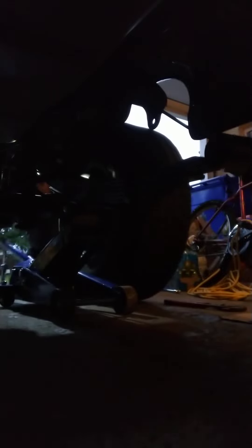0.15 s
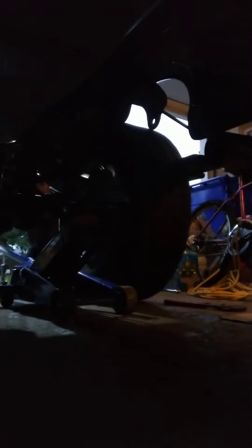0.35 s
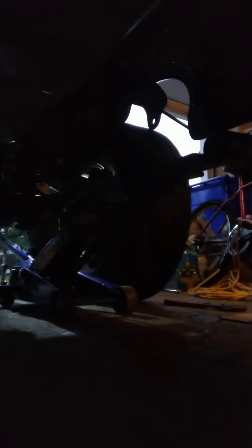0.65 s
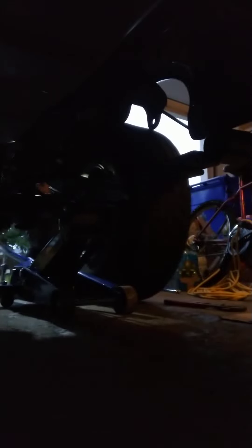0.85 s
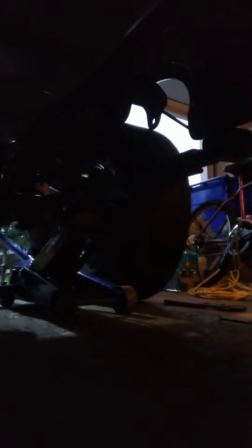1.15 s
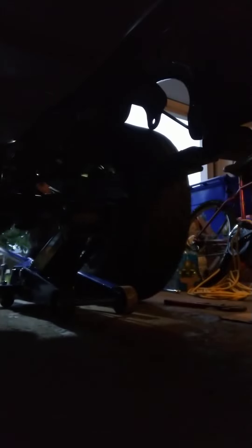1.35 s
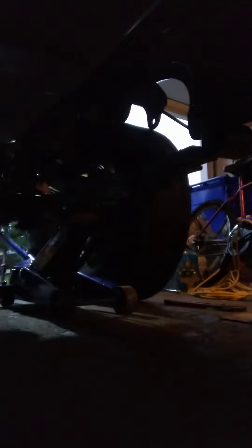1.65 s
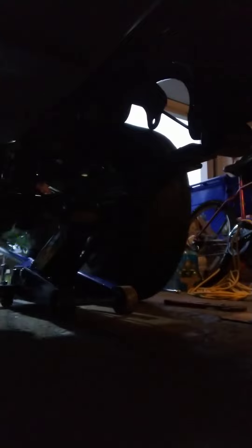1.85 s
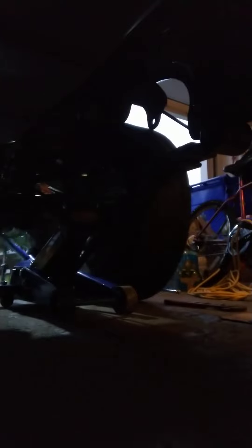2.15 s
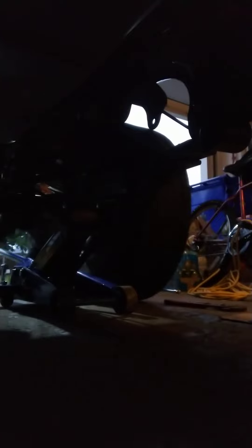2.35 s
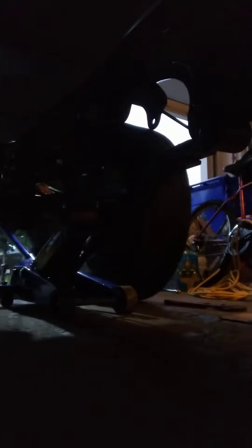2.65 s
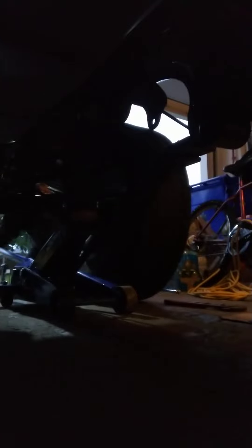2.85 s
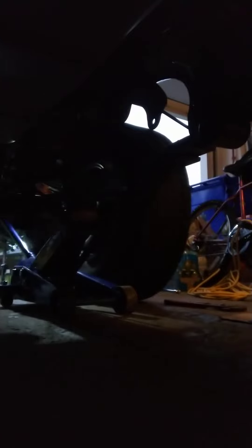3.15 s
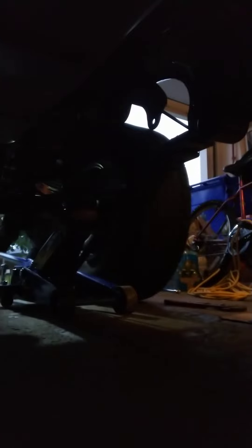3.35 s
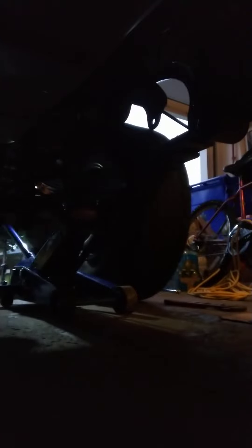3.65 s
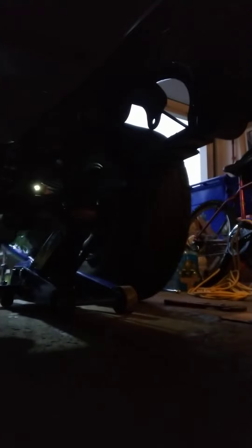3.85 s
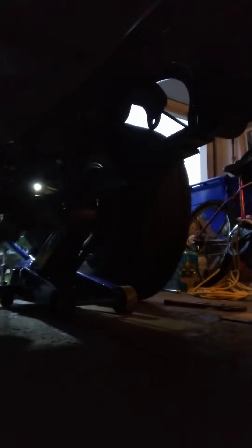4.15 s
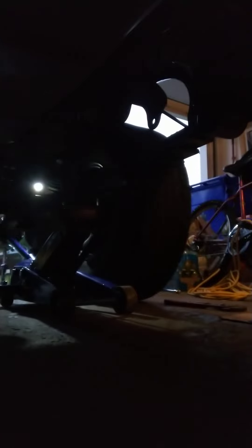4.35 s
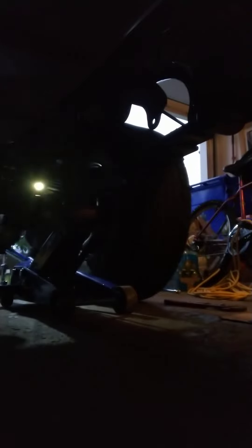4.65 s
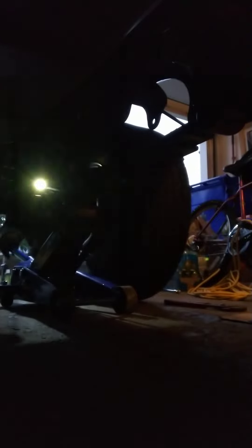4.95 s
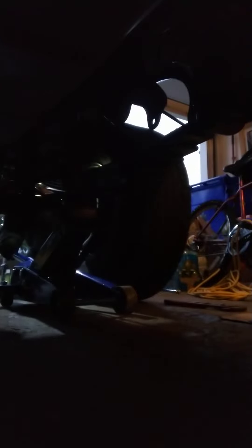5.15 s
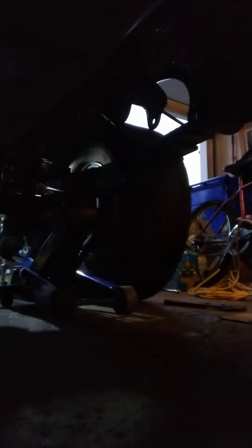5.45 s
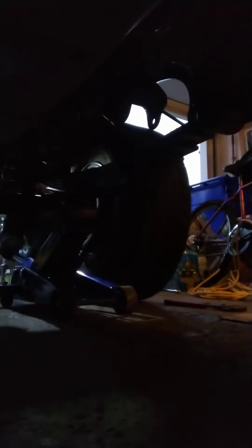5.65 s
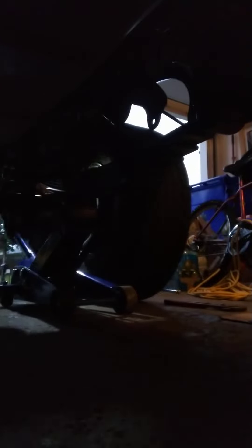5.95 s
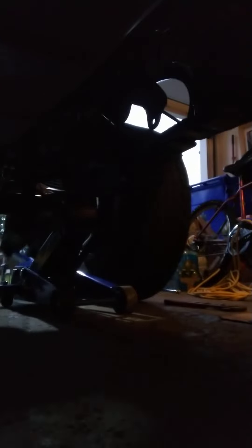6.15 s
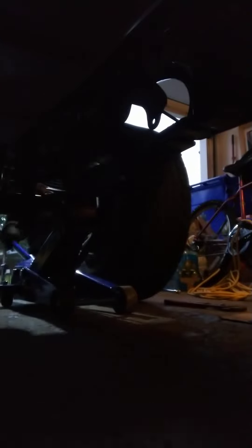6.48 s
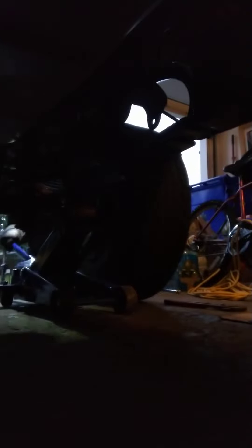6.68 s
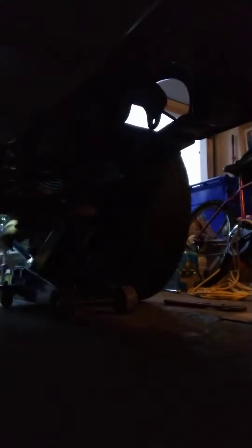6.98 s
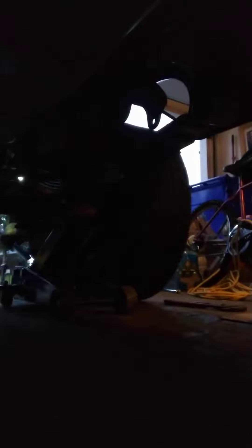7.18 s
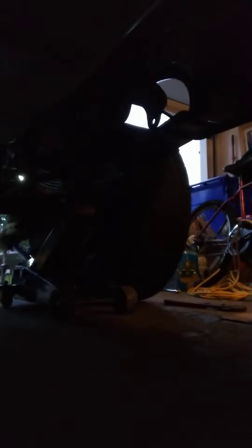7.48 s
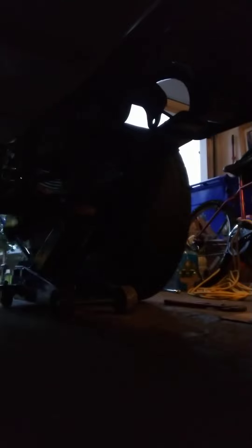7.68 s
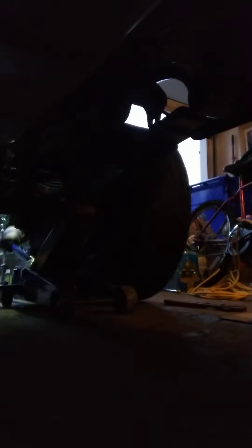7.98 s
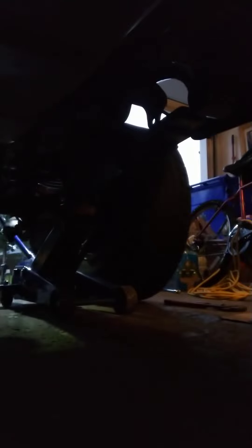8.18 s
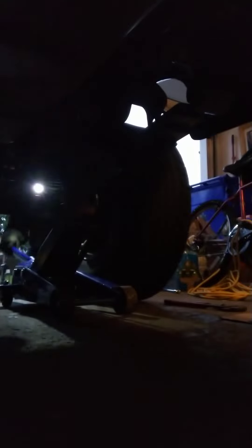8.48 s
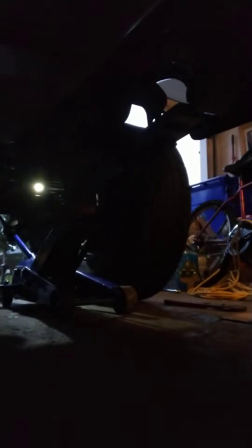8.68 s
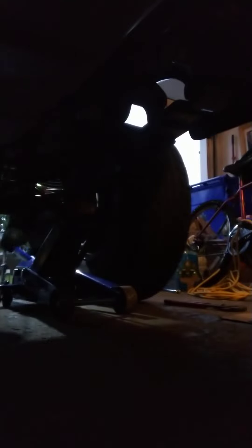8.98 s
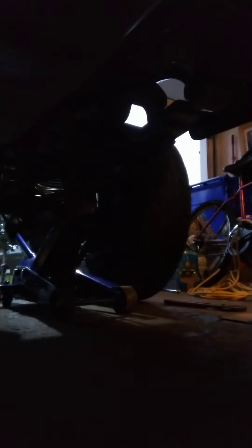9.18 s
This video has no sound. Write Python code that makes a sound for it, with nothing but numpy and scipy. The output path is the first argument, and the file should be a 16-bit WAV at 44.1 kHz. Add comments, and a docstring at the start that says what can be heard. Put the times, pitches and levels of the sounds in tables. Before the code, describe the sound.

Close to the floor of a garage, a jack handle knocks and its linkage clicks in an even rhythm while the truck above softly booms and rattles. A soft hiss ebbs away. About halfway the strokes stop for a brief scuff and one heavy, ringing clank of steel shifting under load. The pumping then carries on, knocking harder, each hit with a short room tail.

```python
"""A hydraulic floor jack, pumped about twice a second, lifts a truck in a garage.
Each stroke opens with a ringing knock of the handle and heaves the truck, which booms softly and
rattles; the linkage clicks as the handle turns back. Once, the steel slips under the load with a loud
clank. Every hit is a burst of crowded steel resonances plus a few clear tones and a short room tail.
Behind it, a soft hiss ebbs as the truck rises, dry pivots squeak and something scuffs the floor."""
import sys
import numpy as np
from scipy import signal
from scipy.fft import rfft, irfft, next_fast_len
from scipy.io import wavfile
from scipy.ndimage import uniform_filter1d

SR = 44100
rng = np.random.default_rng(int(sys.argv[2]) if len(sys.argv) > 2 else 0)


def materialize(psi):
    """Save the field psi as 16-bit PCM at rate SR to the path in sys.argv[1].

    A 1-D psi becomes a single channel; in a 2-D psi each row is a channel.
    """
    bounded = np.clip(np.atleast_2d(psi).T, -1, 1)
    quanta = np.round(bounded * 32767).astype(np.int16)
    wavfile.write(sys.argv[1], SR, quanta)


N = 411012
TIME = np.arange(N) / SR
HIT_TIME = TIME[:SR]  # seconds since a hit
TOP_HZ = 15300

# Fader rides for the hiss, the rumble between strokes and the low rush: time_s, level_db
HISS_RIDE = [(0.0, -46), (0.21, -46.5), (0.57, -55), (1.66, -54), (3.03, -63.5), (4.28, -65), (4.51, -64.5),
             (5.48, -68.5), (5.63, -92), (5.92, -69.5), (6.02, -62), (6.26, -64.5), (6.46, -84),
             (6.83, -72), (7.97, -72.5), (8.67, -79), (9.03, -70.5), (9.32, -72.5)]
RUMBLE_RIDE = [(0, -64.5), (1.1, -68), (2.1, -73), (3.7, -72.5), (4.4, -72), (4.85, -63.5), (5.2, -99),
               (5.7, -78.5), (6.85, -68), (7.18, -93), (7.8, -69.5), (8.35, -71.5), (8.7, -74.5),
               (9.32, -77)]
RUSH_RIDE = [(0, -54), (.35, -57), (.65, -65), (1.9, -67), (2.7, -81.5), (3.9, -100), (9.32, -110)]
# Tone of each noise layer: frequency_hz, gain_db
HISS_EQ = [(700, -24), (1100, -9.5), (2100, -11), (3500, -7), (5400, -4), (6600, 3.5), (8000, -8.5),
           (11000, -14.5), (12500, -27), (15000, -39)]
RUMBLE_EQ = [(20, -44), (38, -21), (52, -7.5), (66, -8), (85, 4), (108, -3), (128, -5), (170, -20.5),
             (300, -30.5), (700, -48.5)]
RUSH_EQ = [(120, -11), (230, 0), (380, -10), (550, -5), (780, -1), (1300, -5), (2200, -11.5), (5000, -28.5)]
SCUFF_EQ = [(800, -25.5), (2100, -10), (4000, -6.5), (6400, 2.5), (8000, -6), (11000, -14.5),
            (15000, -33.5)]
# Dry pivots: start_s, length_s, from_hz, to_hz, level_db
SQUEAKS = [(0.005, 0.055, 735, 790, -49), (0.199, 0.042, 940, 900, -47), (0.791, 0.093, 781, 653, -60),
           (0.82, 0.038, 2260, 1930, -54)]

# Hit cues, levelled before each part's trim. Body lifts the mids, edge the top, ring the clear tones.
# Handle against its stop: start_s, level_db, body_db, edge_db, ring_db, truck_heave_db
KNOCKS = [(0.248,-45.5,2,-7.5,-13,-59), (0.747,-47.5,6,-5,-20,-61), (1.227,-48,4,-6,-20,-61.5),
          (1.75,-47,6,-6,-12,-76), (2.246,-47,5.5,-8,-22,-64.5), (2.783,-47.5,7.5,-7.5,-9,-59.5),
          (3.305,-49,12,-4.5,-21,-64), (3.87,-51.5,9,-9,-12,-71), (4.488,-39.5,1.5,-9.5,-2.5,-62),
          (6.793,-38.5,-0.5,-11,-5.5,-86), (7.279,-37,3.5,-7.5,-1,-68.5), (7.821,-37,1,-11.5,3,-65),
          (8.338,-37.5,1.5,-8.5,-1.5,-71.5), (8.848,-37.5,2.5,-6.5,-6,-63)]
# Pump linkage: start_s, level_db, body_db, edge_db
CLICKS = [(0.382,-30,-9,-7), (0.894,-30.5,-6,-7), (0.967,-48,5.5,-9), (1.481,-48,5.5,-6),
          (1.869,-38.8,-6,-35), (1.983,-47.5,7,-2), (2.498,-50,9.5,-12), (2.865,-50,3,-37),
          (2.993,-48,7.5,-2), (3.536,-49,7,-3), (4.172,-51.5,7,-29), (4.563,-47.5,6,0),
          (4.621,-37.5,3.5,-23), (5.298,-55.5,-16,9), (5.867,-48.5,5.5,-6.5), (6.339,-33,4,0.5),
          (6.438,-48.5,4,5.7), (7.032,-45.5,2.5,-1), (7.5,-51.5,8.5,-7), (8.048,-47,5,-0.5),
          (8.58,-48,-1,0), (9.046,-45,0,1)]
# Joints of the lifting arm: start_s, level_db, body_db
TAPS = [(0.855,-56,1), (1.703,-59.5,10), (2.447,-59,3), (2.91,-56.5,3), (3.503,-52.5,-1), (3.836,-60,3),
        (4.589,-52,9), (4.728,-56.5,9), (5.158,-67.5,27), (6.145,-49,1), (6.309,-47,2), (7.417,-61,6),
        (7.451,-60,9), (8.007,-59,5.5), (8.974,-53.5,9), (9.008,-55.5,-1)]
# Handle socket, saddle and slipping steel: start_s, level_db
CLINKS = [(6.733, -72), (7.731, -49), (8.753, -68.5), (9.267, -53), (9.281, -53.5)]
CLUNKS = [(4.578, -55), (4.609, -51.5), (4.622, -39.5), (6.339, -39.5)]
CLANKS = [(6.0241, -14.5)]

# Tone of each part's crowded, short-lived resonances: frequency_hz, gain_db
HANDLE_EQ = [(120, -31), (250, -8), (450, -1.5), (800, -4), (1400, -0.5), (2200, -10.5), (2800, -2.5),
             (3900, -7.5), (4800, -3.5), (6700, 1), (8300, 0), (11000, -2.5), (15000, -15)]
LINK_EQ = [(120, -38), (400, -2), (900, -6.5), (1500, -7), (2200, -12), (3000, -4.5), (4500, -5),
           (5500, -2), (6500, 4.5), (7300, 2), (8200, -15.5), (11000, -17.5), (15000, -53)]
ARM_EQ = [(120, -9.5), (400, 7), (900, -8), (1450, -3), (2200, -9), (2900, -6), (3600, -9.5), (5000, -12),
          (6800, -3.5), (8000, -16), (11000, -23), (15000, -66)]
SOCKET_EQ = [(120, -1), (600, -2.5), (1450, -4), (2200, -13), (2900, 3.5), (3600, -13.5), (5000, -11),
             (6100, -2.5), (8000, -8.5), (11000, -16.5), (15000, -51)]
SADDLE_EQ = [(120, -8.5), (260, -17), (380, 4.5), (520, -10.5), (900, -15), (1550, -10), (2000, -22),
             (2450, -1.5), (3500, -12), (4400, -7), (8000, -32), (15000, -24)]
FRAME_EQ = [(40,-58), (100,-41), (170,-27), (215,-10), (290,-8.5), (390,-11), (560,-4.5), (833,-3.5),
            (1100,-13), (1500,-9.5), (2100,-16), (2850,-4), (4400,-12), (4950,-1.5), (7000,-1),
            (8800,-10.5), (10500,-11), (14500,-22)]
# Clear tones of each part: pitch_hz, gain_db, t60_s
HANDLE_TONES = [(1140, -25.5, 0.62), (1131, -8.5, 0.22), (1460, -8.5, 0.26), (1590, -10, 0.18),
                (1750, -5.5, 0.2), (2606, -5.5, 0.18), (3270, 0, 0.2), (3300, 0, 0.19), (3330, -4.5, 0.2),
                (4450, -11, 0.27), (4570, -5, 0.082), (4930, 0.5, 0.11), (5760, -2.5, 0.16),
                (6100, -4, 0.079), (6444, -22, .22), (7370, -16, 0.35)]
LINK_TONES = [(1164, -18, 0.43), (2730, -22, .12), (4120, -3.5, 0.091), (6050, 4, 0.068), (6840, 3, 0.075),
              (7360, -5, .14)]
ARM_TONES = [(1116, -12, 0.3), (1514, 1, 0.09), (2690, -22, 0.13)]
SOCKET_TONES = [(1532, -3, 0.27), (2710, -10, 0.12), (2854, 16.5, 0.033), (5739, 2, 0.081),
                (6240, 10, 0.076), (7290, -9, .15)]
SADDLE_TONES = [(358.5, -8, 0.13), (426, -1, 0.11), (1540, -9, 0.17), (2280, -7.5, 0.13),
                (4430, -13, 0.055)]
FRAME_TONES = [(192.7, -1.5, 0.4), (203, -5.5, 0.63), (228.6, -5, 0.5), (259, -4.5, 0.23), (303, -5, 0.26),
               (529, -7, 0.2), (818, -3, 0.18), (1150, -22, 0.79), (2630, -3, .14), (2950, -2, 0.13),
               (5062, -0.5, .15), (5520, -6, 0.37), (5600, -2, .17), (6100, -3, .18), (5900, -5.5, .17),
               (6750, 4, 0.2), (7100, 6.5, 0.16), (7592, 3.5, 0.24), (8400, -10.5, 0.17), (9900, -1, .14),
               (12100, -13.5, 0.1)]

# Stereo lean across the spectrum: frequency_hz, left_minus_right_db
STEREO_LEAN = [(60, 4.5), (110, 7.5), (200, 5.5), (380, 0.5), (700, -4.5), (1300, -7), (2400, -3.5),
               (4400, -8), (6200, -7.5), (7000, 2), (8500, -10.5), (15000, -6)]


def undb(db):
    """Decibels to gain."""
    return 10 ** (np.asarray(db) / 20)


def unit(x, span=slice(None)):
    """Scale to rms 1 within a span of samples."""
    return x / np.sqrt(np.mean(x[..., span] ** 2))


def add(out, sound, start_s):
    """Mix a sound in at its cue."""
    i = max(int(start_s * SR), 0)
    out[:, i:i + sound.shape[1]] += sound[:, :N - i]


def ride(points):
    """Gain over time along a fader ride."""
    time_s, level_db = np.transpose(points)
    return undb(np.interp(TIME, time_s, level_db))


def eq_gain(eq, hz):
    """Gain of an EQ curve at the given frequencies."""
    points_hz, gain_db = np.transpose(eq)
    return undb(np.interp(np.log(hz + 1), np.log(points_hz), gain_db))


def noise(eq, size=N, body_db=0, edge_db=0, body_hz=1050, body_octaves=0.68):
    """Coloured stereo noise with centred bass and wide treble."""
    n = next_fast_len(size)
    hz = np.arange(n // 2 + 1) * SR / n
    mid, side = rfft(rng.standard_normal((2, n)))
    width = hz ** 2 / (hz ** 2 + 550 ** 2)
    body = 1 / (1 + (np.log2((hz + 1) / body_hz) / body_octaves) ** 4)  # midrange hump
    edge = 1 - 1 / (1 + (hz / 7900) ** 24)  # top shelf
    stereo = mid + np.outer([1, -1], width * side)
    spectrum = stereo * eq_gain(eq, hz) * undb(body_db * body + edge_db * edge)
    return unit(irfft(spectrum, n)[:, :size])


def flutter(rate_hz, depth_db):
    """A quick random flutter of level."""
    size = int(SR / rate_hz)
    steps = np.repeat(rng.standard_normal(N // size + 1), size)[:N]
    return undb(depth_db * uniform_filter1d(steps, size))


def swells(cues, attack_s, hold_s, release_db_per_s):
    """An envelope that rises, holds and dies away at each cue; overlaps add in power."""
    power = np.zeros(N)
    for start_s, level_db in cues:
        age = TIME - start_s
        rise = np.clip(age / attack_s, 0, 1)
        fall_db = release_db_per_s * np.maximum(age - attack_s - hold_s, 0)
        power += (rise * undb(level_db - fall_db)) ** 2
    return np.sqrt(power)


def hiss():
    """A bright hiss ebbs as the truck rises; a thinner one follows each click of the linkage."""
    bed = undb(1.4) * ride(HISS_RIDE) * noise(HISS_EQ, body_db=-2)
    cues = [(click[0], -69) for click in CLICKS]
    returns = swells(cues, attack_s=.04, hold_s=.073, release_db_per_s=38)
    thin = returns * noise(HISS_EQ, body_db=-11.5, body_hz=1900, body_octaves=.97)
    return (bed + thin) * flutter(rate_hz=130, depth_db=1.5)


def scuff(start_s=5.36):
    """Something slides briefly over the floor with a soft thud."""
    slide = undb(-50.5) * noise(SCUFF_EQ) * flutter(rate_hz=380, depth_db=2)
    thud = undb(-69) * noise(RUMBLE_EQ)
    return swells([(start_s, 0)], attack_s=.066, hold_s=.025, release_db_per_s=110) * (slide + thud)


def squeaks(waver=.064, waver_s=.0014):
    """Dry pivots stick and slip for a moment at a gliding, unsteady pitch."""
    out = np.zeros((2, N))
    for start_s, length_s, from_hz, to_hz, level_db in SQUEAKS:
        size = int(length_s * SR)
        wobble = unit(uniform_filter1d(rng.standard_normal((2, size)), int(waver_s * SR)))
        pitch_hz = np.linspace(from_hz, to_hz, size) * (1 + waver * wobble)
        tone = np.sin(2 * np.pi * np.cumsum(pitch_hz, axis=1) / SR)
        add(out, undb(level_db) * np.hanning(size) * tone, start_s)
    return out


def truck(heave_lag_s=.041):
    """Strokes heave the truck and heavy hits jolt it: a soft boom under a fluttering low rush."""
    lifts = [(knock[0] + heave_lag_s, knock[-1]) for knock in KNOCKS]
    heave = swells(lifts, attack_s=.1, hold_s=.07, release_db_per_s=123)
    blows = [(s, db - 18) for s, db in CLUNKS] + [(s, db - 41) for s, db in CLANKS]
    jolt = swells(blows, attack_s=.026, hold_s=.11, release_db_per_s=150)
    motion = np.hypot(heave, jolt)
    boom = np.hypot(motion, ride(RUMBLE_RIDE)) * noise(RUMBLE_EQ)
    rush = ride(RUSH_RIDE) * noise(RUSH_EQ)
    rush += undb(-10) * motion * noise(RUSH_EQ, body_db=-9, body_octaves=2.1)
    return boom + rush * flutter(rate_hz=25, depth_db=4)


def shudder():
    """Loose metal shivers on for a moment after the clank: one swell of bright and low noise."""
    shiver = undb(-34) * noise(HISS_EQ) + undb(-39) * noise(RUSH_EQ)
    return swells(CLANKS, attack_s=.07, hold_s=.04, release_db_per_s=126) * shiver


def fade(t60_s):
    """Exponential decay after a hit."""
    return np.exp(-np.log(1000) * HIT_TIME / t60_s)


def crowded(eq, count=260):
    """Break a smooth EQ into the many uneven resonances of one steel part."""
    hz = np.linspace(np.sqrt(100), np.sqrt(TOP_HZ), count) ** 2
    peaks_db = rng.uniform(-9, 5, count)
    return np.column_stack([hz, 20 * np.log10(eq_gain(eq, hz)) + peaks_db])


def ringing(tones, bloom_s, bloom_cycles=4, wide_hz=2500):
    """A part's clear tones; each blooms over a few cycles and varies a little from hit to hit."""
    gains = undb(rng.standard_normal((len(tones), 2, 1)))
    phases = rng.uniform(-np.pi, np.pi, (len(tones), 2, 1))
    knots_s = np.linspace(0, HIT_TIME[-1], 90)
    ripples = .3 * rng.standard_normal((len(tones), 2, len(knots_s)))
    out = 0
    for (hz, db, t60_s), gain, phase, ripple in zip(tones, gains, phases, ripples):
        # long waves reach both channels nearly in step
        phase = phase[0] + (phase - phase[0]) * min(hz / wide_hz, 1)
        # reflections under the truck roughen the level and phase of the ring
        swell, shift = (np.interp(HIT_TIME, knots_s, r) for r in ripple)
        bloom = 1 - np.exp(-HIT_TIME / (bloom_s + bloom_cycles / hz))
        envelope = undb(db) * gain * bloom * fade(t60_s) * (1 + swell)
        out = out + envelope * np.sin(2 * np.pi * hz * HIT_TIME + shift + phase)
    return out


def steel_hits(cues, eq, tones, ring_db, t60_s, room_db, room_t60_s, rise_s, low_rise_s,
               trim_db=0, bloom_s=.0066):
    """Hits on one steel part: a crash of crowded resonances, a clear ring and the garage's tail."""
    out = np.zeros((2, N))
    onset = slice(int(.025 * SR))  # the first 25 ms set a hit's level
    attack = 1 - np.exp(-(HIT_TIME / rise_s) ** 2)
    decay = np.hypot(fade(t60_s), undb(room_db) * fade(room_t60_s))
    resonances = crowded(eq)
    low_pass = signal.butter(2, 1000, fs=SR, output="sos")
    for cue in cues:
        start_s, level_db, body_db, edge_db, extra_ring_db = np.pad(cue, (0, 5 - len(cue)))
        crash = noise(resonances, len(HIT_TIME), body_db, edge_db)
        # the lows build up later than the treble
        crash -= signal.sosfiltfilt(low_pass, crash) * np.exp(-HIT_TIME / low_rise_s)
        ring = undb(ring_db + extra_ring_db) * unit(ringing(tones, bloom_s), onset)
        hit = attack * (unit(crash * decay, onset) + ring)
        add(out, undb(level_db + trim_db) * unit(hit, onset), start_s)
    return out


def arm_taps(lag_s=.093, spread_s=.02):
    """Loose arm joints tap dully; each stroke shakes out one more, louder the more the truck heaves."""
    chance = rng.standard_normal((len(KNOCKS), 2))
    rattles = [(knock[0] + lag_s + spread_s * late, knock[-1] + 3.5 + 2 * loud)
               for knock, (late, loud) in zip(KNOCKS, chance)]
    return steel_hits(TAPS + rattles, ARM_EQ, ARM_TONES, ring_db=-11, t60_s=.14,
                      room_db=-11, room_t60_s=.26, rise_s=.0025, low_rise_s=.004, trim_db=.5)


def socket_clinks():
    """The handle slips in its socket with a small clink."""
    return steel_hits(CLINKS, SOCKET_EQ, SOCKET_TONES, ring_db=-5, t60_s=.11, bloom_s=.002,
                      room_db=-14, room_t60_s=.3, rise_s=.003, low_rise_s=.005, trim_db=2)


def saddle_clunks():
    """The saddle seats itself under the frame with a hollow clunk."""
    return steel_hits(CLUNKS, SADDLE_EQ, SADDLE_TONES, ring_db=-14, t60_s=.095,
                      room_db=-12.5, room_t60_s=.37, rise_s=.00078, low_rise_s=.0021, trim_db=1)


def load_clank():
    """Steel slips under the load with one heavy clank."""
    return steel_hits(CLANKS, FRAME_EQ, FRAME_TONES, ring_db=-10.5, t60_s=.14, bloom_s=.0025,
                      room_db=-19.5, room_t60_s=.4, rise_s=.0025, low_rise_s=.0064, trim_db=1.4)


def linkage_clicks():
    """The pump linkage takes up its slack with dry, bright clicks."""
    return steel_hits(CLICKS, LINK_EQ, LINK_TONES, ring_db=-16, t60_s=.038,
                      room_db=-6.5, room_t60_s=.18, rise_s=.0022, low_rise_s=.034, trim_db=-1)


def handle_knocks(bounce_s=.015, bounce_db=-9.5):
    """On each stroke the handle rings against its stop and bounces once, more softly."""
    knocks = [knock[:-1] for knock in KNOCKS]
    bounces = [(s + bounce_s, db + bounce_db, *timbre) for s, db, *timbre in knocks]
    return steel_hits(knocks + bounces, HANDLE_EQ, HANDLE_TONES, ring_db=-9, t60_s=.135, bloom_s=.007,
                      room_db=-16, room_t60_s=.28, rise_s=.0026, low_rise_s=.005)


def scene():
    """The jack's steel hits up front, the truck and the small noises behind."""
    pumping = handle_knocks() + linkage_clicks() + arm_taps() + socket_clinks()
    settling = saddle_clunks() + load_clank()
    return pumping + settling + squeaks() + hiss() + scuff() + truck() + shudder()


def record(dry):
    """Bass leans left and most treble right; the loudest peaks are rounded and the top is cut."""
    n = next_fast_len(N)
    lean = np.sqrt(eq_gain(STEREO_LEAN, np.arange(n // 2 + 1) * SR / n))
    stereo = irfft(rfft(dry, n) * np.array([lean, 1 / lean]), n)[:, :N]
    high_cut = signal.ellip(8, .2, 70, TOP_HZ, fs=SR, output="sos")
    return signal.sosfilt(high_cut, np.tanh(stereo))


dry = scene()
out = record(dry)
materialize(out)
```